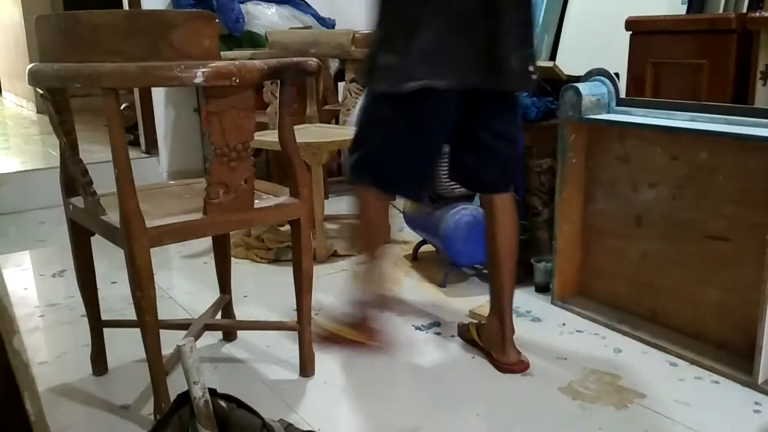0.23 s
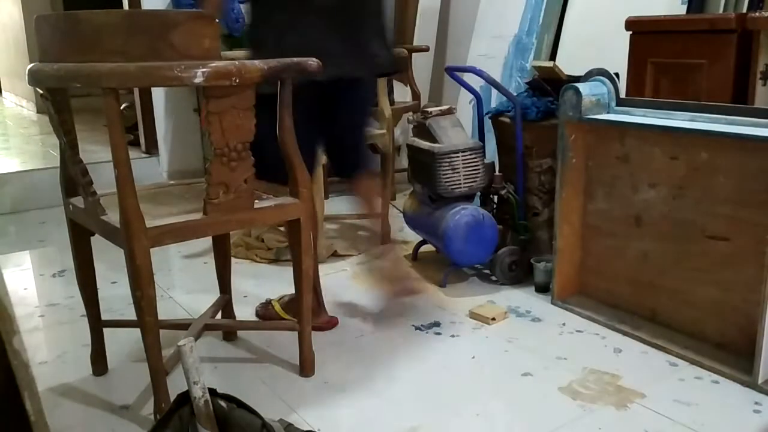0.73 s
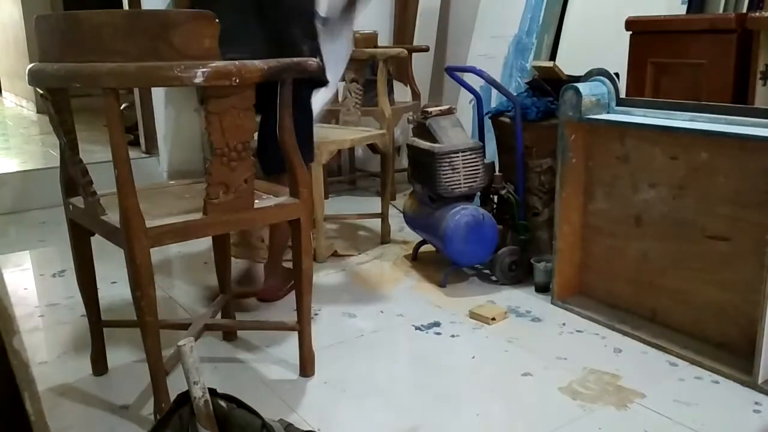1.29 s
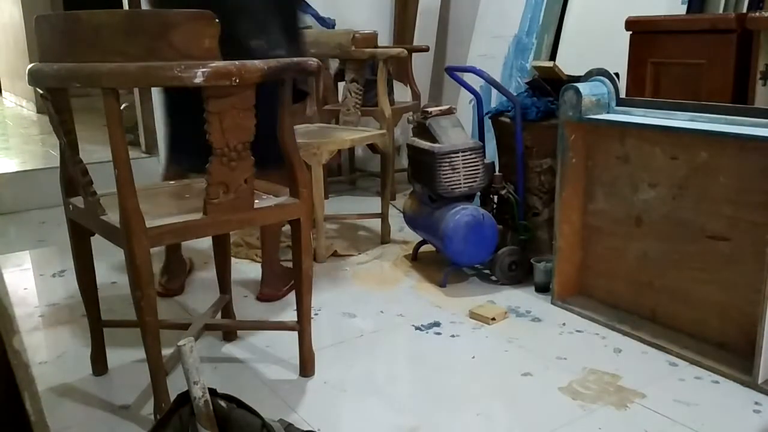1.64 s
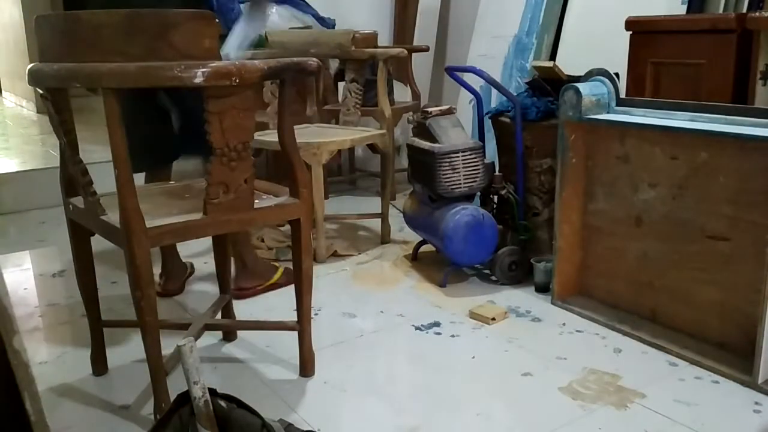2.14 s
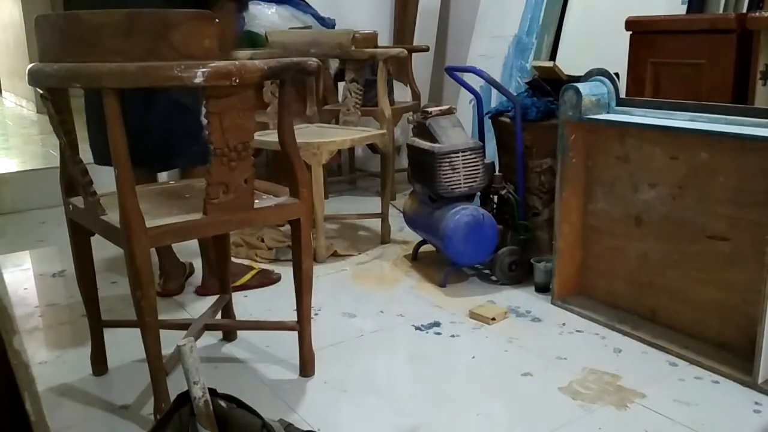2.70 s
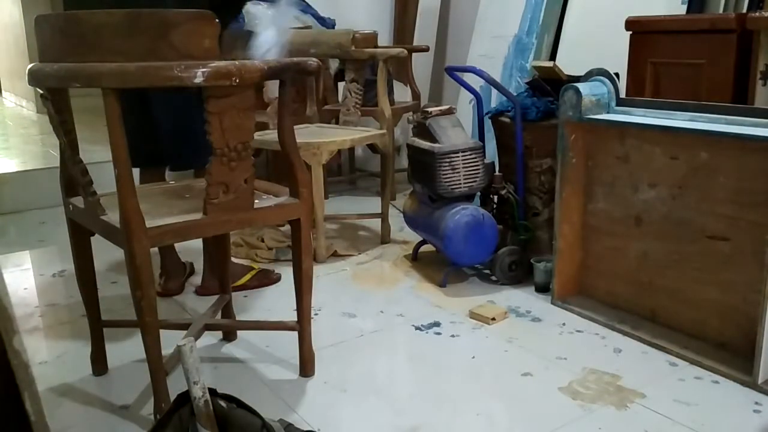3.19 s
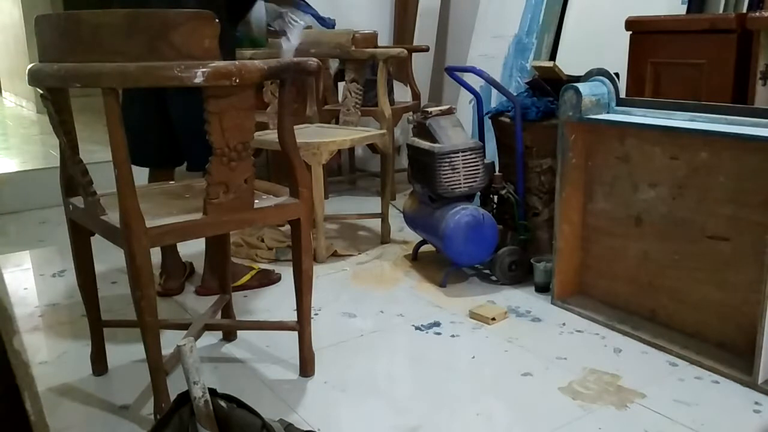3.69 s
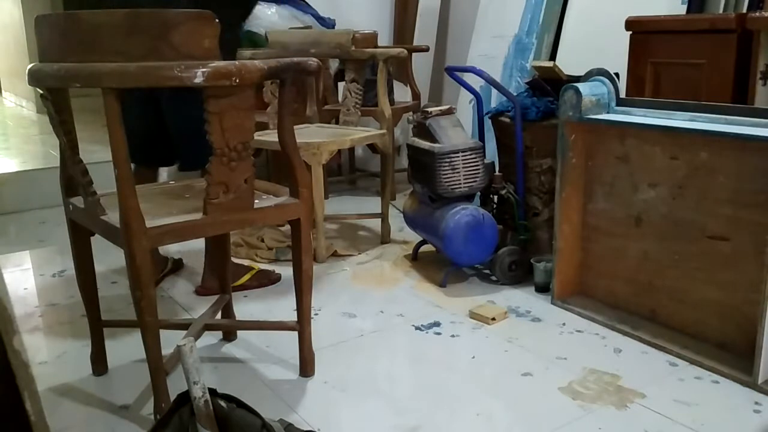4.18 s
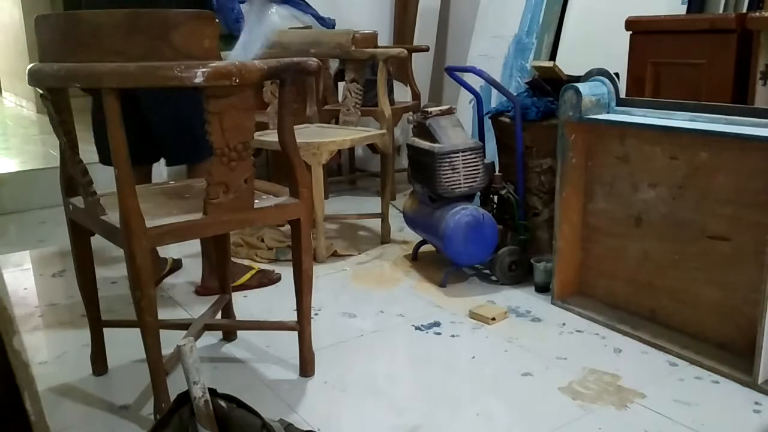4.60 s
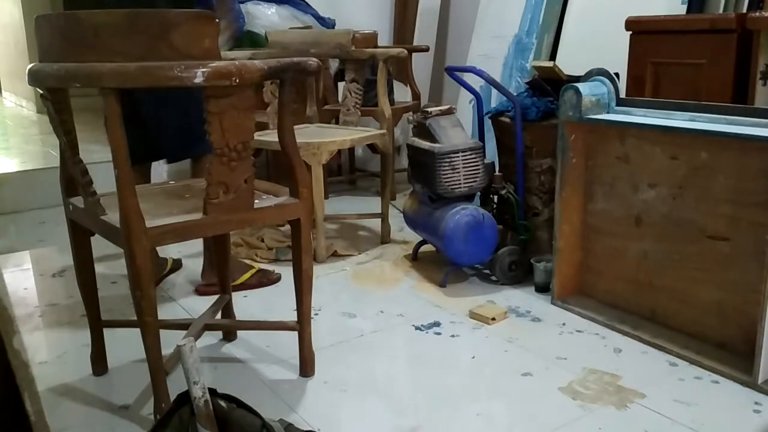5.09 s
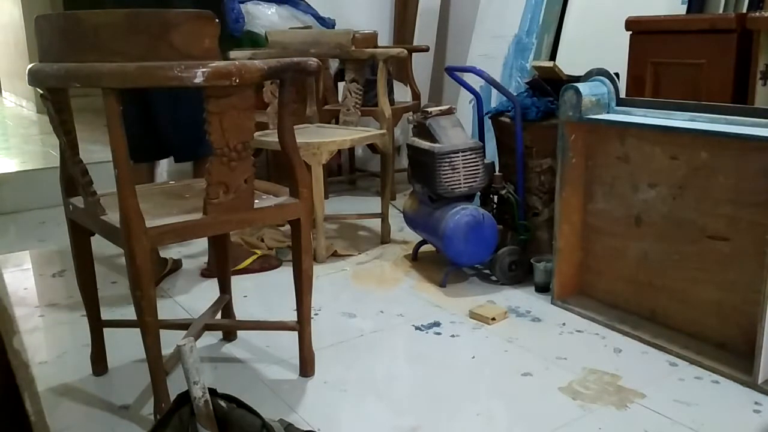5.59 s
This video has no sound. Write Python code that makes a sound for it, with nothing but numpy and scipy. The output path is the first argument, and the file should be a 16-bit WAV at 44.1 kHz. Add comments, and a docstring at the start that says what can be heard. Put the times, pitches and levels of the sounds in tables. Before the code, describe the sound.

Someone shuffles in rubber sandals, then beats dust off furniture with a cloth, each whoosh ending in a crackling smack that rings wood and room.

```python
"""A bare, tiled workshop: someone in flip-flops takes a few steps and beats dust off furniture with a cloth.
Soles tick and drag as fading or swelling grains of noise; waved cloth is a rush of air with a rubbing hiss.
Each stroke swishes in, lands in three crackling slaps, rings modes of wood and room, and sends a draught
to the microphone. Dense reflections answer the close sounds, but not the ring or the draught.
Far outside an engine enters partway, two wavering tones over a steady hush of filtered noise."""
import sys
import numpy as np
from scipy import signal
from scipy.fft import rfft, irfft, next_fast_len
from scipy.io import wavfile

SR = 44100
rng = np.random.default_rng(int(sys.argv[2]) if len(sys.argv) > 2 else 0)


def to_wav(s):
    """Save 16-bit WAV."""
    ch = np.atleast_2d(s).T  # columns
    pcm = np.round(np.clip(ch, -1, 1) * 32767)  # PCM
    wavfile.write(sys.argv[1], SR, pcm.astype(np.int16))


N = 257334
TIME = np.arange(N) / SR
AGE = TIME[:SR]  # one second in the life of an event

# Hush of the room, tone before its level is set: f/Hz, level/dB
HUSH_TONE = [(20, -8.5), (55, 3.5), (90, -3), (180, -2), (300, -10.5), (600, -14.5), (800, -23.5),
             (1200, -28), (2500, -36.5), (6000, -44.5), (11000, -31.5), (13000, -38.5), (15000, -61.5)]
# Far engine, before its gains: t/s, firing rate f/Hz, level/dB, third harmonic level/dB
ENGINE_COURSE = [(2.98, 125, -73, -89.5), (3.106, 138.6, -66, -94), (3.254, 172, -68, -80.5),
                 (3.496, 202.3, -67, -81), (3.664, 207, -74, -70), (3.77, 205, -69, -86.5),
                 (4.078, 222, -74, -93.5), (4.21, 201.4, -58, -61.5), (4.66, 188.4, -64.5, -85),
                 (4.752, 190.6, -61.5, -78), (4.8, 196, -67, -76), (5.27, 190.1, -67.5, -91),
                 (5.348, 182.4, -55, -80), (5.5, 188.5, -68, -92.5)]
# Reverberation, before the last of the tail is faded: f/Hz, t60/s
ROOM_DECAY = [(60, 0.5), (250, 0.58), (600, 0.64), (1500, 0.68), (3000, 0.71), (6000, 0.54), (11000, .57),
              (16000, 0.43)]
# The walker crosses from right to centre: t/s, delay at the left port/ms
WALKER_BEARING = [(0, 0.43), (1, 0.25), (2.6, .12), (4.3, .04), (5.8, 0.034)]
# Tone difference of the ports: f/Hz, right minus left level/dB
PORT_DIFFERENCE = [(70, 1.7), (180, -2.1), (500, 0.5), (1500, 0.5), (3000, -3), (6000, 2), (9500, 4),
                   (14000, 2.5)]
# Fine rubbing and ticking, relative tone: f/Hz, level/dB
RUB_TONE = [(30, -41), (1500, -15.5), (4500, -16.5), (8000, -7), (11000, 1), (13500, -1.5), (16000, -8.5)]
# Rush of air, relative tone: multiple of the centre frequency, level/dB
AIR_TONE = [(.04, -18), (.4, -12.5), (.7, -5), (1, -4), (1.4, -7.5), (2.8, -15.5), (5, -25.5), (20, -44.5)]
# Narrow resonances nearby that sing with every rush of air: f/Hz, width/Hz, added level/dB
RESONANCES = [(770, 45, 0.5), (1028, 15, 6), (1560, 90, -1.5), (2200, 270, -2)]
# Flip-flop ticks, before room and port gains: t/s, level/dB, fade time/ms, tilt/(dB per octave)
SOLE_TICKS = [(0.2485, -52.5, 5, 7), (0.3418, -61, 1.1, -2), (0.353, -57, 1, 2), (0.5422, -64, 2.5, 9)]
# Soles drag over the tiles, before room and port gains:
# t/s of the peak, fall/s, air level/dB, air centre f/Hz, hiss level/dB
SOLE_SCUFFS = [(0.01, 0.045, -68.5, 1890, -72), (0.205, 0.022, -64.5, 495, -60.5),
               (0.249, 0.13, -99, 900, -44.5), (0.358, 0.078, -58.5, 1320, -47),
               (0.458, 0.065, -61, 1120, -61.5)]
# Cloth lifted or shaken out between strokes, before room and port gains:
# t/s of the peak, rise/s, air level/dB, hiss level/dB
CLOTH_WAVES = [(0.716, 0.12, -69, -98), (0.91, 0.036, -52, -44.5), (1.24, 0.091, -44.5, -52.5),
               (1.358, 0.058, -54.5, -50), (1.607, 0.069, -60.5, -77.5), (1.705, 0.041, -45, -48.5),
               (2.068, 0.089, -45, -53.5), (2.15, 0.023, -56, -58), (2.457, 0.049, -54.5, -48.5),
               (3.144, 0.099, -61, -80.5), (3.458, 0.099, -61.5, -86), (5.329, 0.1, -68.5, -92),
               (5.467, 0.029, -74.5, -60)]
# Cloth smacking on wood, relative tone: f/Hz, level/dB
SMACK_TONE = [(30, -29.5), (150, -7), (260, 2.5), (450, -3), (680, -2.5), (850, -8), (1200, -8),
              (1600, -13), (2100, -14), (3000, -26.5), (5000, -34.5), (16000, -59)]
# Snapping fibres, relative tone: f/Hz, level/dB
CRACKLE_TONE = [(30, -49.5), (1000, -15), (3500, -4.5), (5500, -9), (8000, -5.5), (10500, 2), (12500, 1.5),
                (15500, -9.5), (20000, -17)]
# Modes of the furniture, relative: f/Hz, t60/s, first spot level/dB, second spot level/dB
WOOD_MODES = [(178.4, 0.79, -22.5, -47), (216.7, 0.3, -5.5, -22), (220.7, 0.51, -4, -7),
              (242.5, 0.39, -27, 2.5), (291.3, 0.6, -32.5, -12), (352.4, 0.13, -6, -29.5),
              (478, 0.44, -26.5, -6), (535, 0.46, -17, -26), (672, 0.45, -14.5, -15),
              (1003, 0.33, -15.5, -36), (1145, .4, -21.5, -34.5), (1497, 0.65, -28, -34),
              (2070, 0.56, -35.5, -43)]
# Standing waves of the room, relative: f/Hz, t60/s, level/dB
ROOM_MODES = [(56.6, 0.75, 2.5), (60.6, 0.46, -12.5), (105.4, 1, -15), (122, 0.53, -9.5)]
# Rumble of moving air, relative tone: f/Hz, level/dB
DRAUGHT_TONE = [(15, -7.5), (35, 6.5), (65, -3), (110, -12), (250, -21.5), (1000, -103.5)]
# Tip, body and trailing folds: thump half-width/ms, multiple of the stroke's fade time,
# crackle level/dB against the stroke's
SLAP_CONTACTS = [(3.3, 1.2, -1), (1.3, 1, -0.5), (1.8, 3, 0.5)]
# Strokes, levels before the gains of each layer: t/s, lead of the tip/ms,
# tip and trailing folds level/dB against the main slap, fade time of the main contact/ms,
# smack level/dB, smack tilt/(dB per octave), crackle level/dB, air thump level/dB, swing level/dB,
# wood level/dB, place (0 first spot, 1 second spot), room boom level/dB,
# draught level/dB, travel time of the draught/s, fade time of its eddies/s
CLOTH_STROKES = [(0.938, 9.2, -7, -1.5, 1.72, -26, 0.64, -32.5, -31, -41, -9.5, 0.065, -25.5, -43, 0.23, .12),
                 (1.767, 10, -5, -7.5, 2.9, -31.5, -0.1, -41, -29, -37, -26, 0.02, -33, -33.5, .15, .06),
                 (2.584, 6, 2, -1, 3.1, -34.5, 1, -38, -33, -56, -15, 0.8, -38.5, -52.5, 0.11, 0.09),
                 (4.2947, 8, -23.5, 0, 3.87, -35.5, 1, -40.5, -34.5, -55, -27.5, 0.26, -28.5, -40, 0.18, 0.19),
                 (4.9089, 22, -11.5, -4, 1.92, -32, 0.5, -43.5, -31, -61, -24.5, 0.74, -33.5, -42.5, 0.12, 0.58),
                 (5.6047, 10.5, -17.5, -2.5, 0.68, -28.5, -1.87, -41, -28, -59, -34, 1, -26.5, -55, 0.084, 0.11)]

HUSH_DB = -67
ENGINE_FADE_S = 0.051  # it comes in just before its first point
ENGINE_DB, THIRD_DB = 2.5, 2.5  # gain of the firing tone and of its third harmonic
ENGINE_WOBBLE, THIRD_WOBBLE = 0.0291, 0.0057  # pitch wobble as a share of the frequency
# A far wall sends back a second bunch of reflections
WALL_ECHO_S, WALL_ECHO_SPREAD_S, WALL_ECHO_DB = 0.092, 0.0098, -12.5
PORT_GAP_M, TOP_HZ = 0.17, 16200
SCUFF_RISE = 0.18  # rise time as a share of the fall
WAVE_HZ, WAVE_FALL = 870, 0.8  # centre of the rush of air; fall time as a share of the rise
# The swing peaks just ahead of the slap; its hiss is set against its air
SWING_LEAD_S, SWING_RISE_S, SWING_FALL_S, SWING_HZ, SWING_HISS_DB = 0.019, 0.035, 0.0058, 400, -21
THUMP_LEAD_S = 0.01  # room for the push before the thump's centre
TRAIL_S, RING_LAG_S = 0.014, 0.004  # after the main slap: folds land, wood starts to ring
PUSH_LEAD_S, PUSH_S, PUSH_DB = 0.038, 0.022, -13  # air ahead of the cloth; dB against the thump
DRAUGHT_S, EDDY_DB = 0.046, -7  # dB against the draught


def undb(db):
    """Decibels to gain."""
    return 10 ** (np.asarray(db) / 20)


def at_pitch(hz, points):
    """Read (Hz, value) points on a log-frequency axis."""
    f, value = np.transpose(points)
    return np.interp(np.log(np.maximum(hz, 1)), np.log(f), value)


def colour(x, points):
    """Minimum-phase filter with the given (Hz, dB) response, made by folding its cepstrum."""
    size = next_fast_len(len(x) + SR // 10) * 2
    gain = undb(at_pitch(np.fft.rfftfreq(size, 1 / SR), points))
    cepstrum = irfft(np.log(gain))
    cepstrum[1:size // 2] *= 2
    cepstrum[size // 2 + 1:] = 0
    response = np.exp(rfft(cepstrum))
    return irfft(rfft(x, size) * response)[:len(x)]


def tilted(points, db_per_octave):
    """Tilt a tone towards the treble or the bass."""
    return [(hz, db + db_per_octave * np.log2(hz)) for hz, db in points]


def level(x, db):
    """Set the rms level."""
    return x * undb(db) / np.sqrt(np.mean(x ** 2))


def burst(x, db):
    """Give a short sound the energy of db held for a tenth of a second."""
    return x * undb(db) * np.sqrt(SR / 10 / np.sum(x ** 2))


def left_delay_ms(s):
    """Sound from the right reaches the left port later."""
    return np.interp(s, *np.transpose(WALKER_BEARING))


def add(out, s, x):
    """Mix x in at time s, a little later at the left port."""
    arrivals = (s + left_delay_ms(s) / 1000, s)
    for port, sound, when in zip(out, np.broadcast_to(x, (2, SR)), arrivals):
        start = int(round(when * SR))
        lo, hi = max(start, 0), min(start + SR, N)
        port[lo:hi] += sound[lo - start:hi - start]


def walk(rate):
    """Slow random curve through rate knots a second, centred on zero."""
    knots = rng.standard_normal(int(N / SR * rate) + 2)
    return np.interp(TIME * rate, np.arange(len(knots)), knots)


def grains(spread_db):
    """A second of dense clicks whose strength changes every 16 samples."""
    size, strength = rng.standard_normal((2, SR))
    return size * undb(spread_db * np.repeat(strength, 16)[:SR])


def fade(ms):
    """Exponential fade with the given time constant."""
    return np.exp(-AGE * 1000 / ms)


def decay(t60):
    """Exponential decay that loses 60 dB in t60 seconds."""
    return np.exp(-np.log(1000) * AGE / t60)


def diffuse(size):
    """Noise from all sides at two spaced ports: alike in the bass, unrelated in the treble."""
    likeness = np.sinc(2 * np.fft.rfftfreq(size, 1 / SR) * PORT_GAP_M / 343)  # speed of sound in m/s
    mid, side = rfft(rng.standard_normal((2, size))) * np.sqrt([1 + likeness, 1 - likeness])
    return irfft([mid + side, mid - side], size)


def room(x, direct_db, build_s=0.0033, early_db=1.0, early_s=0.011, end_s=0.38):
    """The direct sound, then reflections that thicken quickly and die away band by band."""
    field, tail = rfft(diffuse(SR)), 0
    octave = np.log2(np.clip(np.arange(field.shape[1]), 64, 16384))
    for k in range(6, 15, 2):  # overlapping bands centred on 2 ** k Hz
        band = irfft(field * np.maximum(1 - abs(octave - k) / 2, 0), SR)
        tail = tail + band * decay(at_pitch(2 ** k, ROOM_DECAY))
    # floor and nearby furniture crowd the first reflections
    tail = tail * (1 - np.exp(-AGE / build_s)) * (1 + undb(early_db) * np.exp(-AGE / early_s))
    tail *= 1 + undb(WALL_ECHO_DB) * np.exp(-((AGE - WALL_ECHO_S) / WALL_ECHO_SPREAD_S) ** 2)
    # the last of the tail fades faster
    tail *= np.exp(-(AGE / end_s) ** 4)
    tail /= np.sqrt(np.sum(tail ** 2) / 2)
    tail[:, 0] += undb(direct_db)
    return signal.fftconvolve(tail, x[None], axes=1)[:, :SR]


def clutter(x, echo_db=-11.0, corner_hz=2500.0, count=8):
    """Chair legs and rails close by throw back the treble within a few milliseconds, which combs it."""
    hz = np.fft.rfftfreq(SR, 1 / SR)
    echoes = np.zeros(SR)
    delays = rng.integers(SR // 2000, SR // 130, count)
    echoes[delays] = undb(echo_db) * rng.choice([-1, 1], count)
    share = hz / (hz + corner_hz)
    comb = (1 + share * rfft(echoes)) / np.sqrt(1 + share ** 2 * np.sum(echoes ** 2))
    return irfft(rfft(x) * comb, SR)


def hush():
    """Diffuse coloured noise, alike at both ports only in the bass, with a slight waver in level."""
    noise = np.array([colour(port, HUSH_TONE) for port in diffuse(N)])
    return level(noise, HUSH_DB) * undb(0.4 * walk(6))


def far_tone(hz, db, wobble):
    """A tone that arrives by many paths, so that it wavers and flutters."""
    phase = 2 * np.pi * np.cumsum(hz * (1 + wobble * walk(30))) / SR
    paths = 1 + 0.5 * (walk(25) + 1j * walk(24))
    return np.imag(paths * np.exp(1j * phase)) * undb(db + 1.5 * walk(14))


def far_engine():
    """The firing tone and its third harmonic climb in pitch, then ease back and hover."""
    s, *columns = np.transpose(ENGINE_COURSE)
    hz, db, third_db = (np.interp(TIME, s, column) for column in columns)
    firing = far_tone(hz, db + ENGINE_DB, ENGINE_WOBBLE)
    third = far_tone(3 * hz, third_db + THIRD_DB, THIRD_WOBBLE)
    comes_in = np.clip(1 + (TIME - s[0]) / ENGINE_FADE_S, 0, 1)
    return (firing + third) * comes_in


def flip_flops():
    """Rubber soles tick on gritty tiles close by: fading grains with a rubbing tone."""
    out = np.zeros((2, N))
    for s, db, fade_ms, tilt_db in SOLE_TICKS:
        tick = colour(grains(2.0) * fade(fade_ms), tilted(RUB_TONE, tilt_db))
        ports = undb([[-9.0], [-5.0]])  # left, right
        add(out, s, room(burst(tick, db), direct_db=9.5) * ports)
    return out


def sing(x):
    """Add the narrow resonances that a rustle excites."""
    out = x
    for hz, width, db in RESONANCES:
        out = out + undb(db) * signal.lfilter(*signal.iirpeak(hz, hz / width, fs=SR), x)
    return out


def swish(s, rise, fall, air_db, air_hz, hiss_db):
    """Moving cloth or a dragging sole: a rush of air with the hiss of rubbing on top."""
    out = np.zeros((2, N))
    lead = 0.25  # s of run-up before the peak
    speed = np.exp(-((AGE - lead) / np.where(AGE < lead, rise, fall)) ** 2)
    air_tone = [(k * air_hz, db) for k, db in AIR_TONE]
    air = burst(sing(colour(grains(3.5) * speed, air_tone)), air_db)
    hiss = burst(colour(grains(4.3) * speed, RUB_TONE), hiss_db)
    shade_db = 3.6 * left_delay_ms(s)  # the phone shades its far port
    ports = undb(np.array([[-shade_db], [shade_db]]) - 7.5)
    add(out, s - lead, room(clutter(air + hiss), direct_db=-2.5) * ports)
    return out


def scuffs():
    """A sole catches the floor quickly and slides to rest."""
    return sum(swish(s, SCUFF_RISE * fall, fall, air_db, air_hz, hiss_db)
               for s, fall, air_db, air_hz, hiss_db in SOLE_SCUFFS)


def waving():
    """The cloth stirs a rush of air as it is waved about between strokes."""
    return sum(swish(s, rise, WAVE_FALL * rise, air_db, WAVE_HZ, hiss_db)
               for s, rise, air_db, hiss_db in CLOTH_WAVES)


def gust(s, push_db, draught_db, travel_s, eddy_s):
    """A stroke pushes air ahead and sends a draught after it, whose eddies rumble on the microphone."""
    push = np.exp(-((TIME - s + PUSH_LEAD_S) / PUSH_S) ** 2)
    since = TIME - s - travel_s
    draught = np.exp(-(since / DRAUGHT_S) ** 2)
    eddies = (since > 0) * undb(EDDY_DB) * np.exp(-abs(since) / eddy_s)
    strength = undb(push_db) * push + undb(draught_db) * np.maximum(draught, eddies)
    return strength * level(colour(rng.standard_normal(N), DRAUGHT_TONE), 0)


def ring(hz, t60, rise_s, turn):
    """One mode that swells and fades, with its own phase for each value of turn."""
    swell = 1 - np.exp(-(AGE / rise_s) ** 2)
    return np.sin(2 * np.pi * hz * (AGE + turn)) * swell * decay(t60)


def furniture(s, wood_db, place, boom_db):
    """The place of a blow decides which modes of the wood speak; the room booms along."""
    out = np.zeros((2, N))
    turn = rng.random() / 50  # s
    wood = sum(undb(np.interp(place, [0, 1], spots_db)) * ring(hz, t60, 0.012, turn)
               for hz, t60, *spots_db in WOOD_MODES)
    boom = sum(undb(db) * ring(hz, t60, 0.005, turn) for hz, t60, db in ROOM_MODES)
    add(out, s, undb(wood_db) * wood + undb(boom_db) * boom)
    return out


def folds(fade_ms):
    """Many folds land within milliseconds: a scatter of clicks evened out to equal strength at every pitch."""
    clicks = rfft(grains(4.0) * fade(fade_ms))
    return irfft(clicks / abs(clicks), SR) * (AGE < 0.15)


def slap(thump_db, width_ms, smack_db, tilt_db, crackle_db, fade_ms):
    """Trapped air is pushed out and sucked back while folds smack and fibres crackle: (thump, room sound)."""
    u = (AGE - THUMP_LEAD_S) * 1000 / width_ms
    thump = burst(-u * np.exp(-u ** 2 / 2), thump_db - 6.0)
    smack_tone = tilted(SMACK_TONE, tilt_db)  # a slack cloth lands duller
    smack = burst(colour(folds(fade_ms), smack_tone), smack_db)
    crackle = burst(colour(grains(7.0) * fade(fade_ms), CRACKLE_TONE), crackle_db)
    return thump, room(clutter(smack + crackle) + undb(-1.0) * thump, direct_db=-12.5)


def slaps(s, lead_ms, tip_db, trail_db, fade_ms, smack_db, tilt_db, crackle_db, thump_db):
    """The tip of the cloth lands first, then its body, then the trailing folds."""
    out = np.zeros((2, N))
    landings = [(s - lead_ms / 1000, tip_db), (s, 0), (s + TRAIL_S, trail_db)]
    for (when, db), (width_ms, longer, fibre_db) in zip(landings, SLAP_CONTACTS):
        thump, sound = slap(thump_db + db, width_ms, smack_db + db, tilt_db,
                            crackle_db + fibre_db + db, longer * fade_ms)
        add(out, when - THUMP_LEAD_S, thump)
        add(out, when, sound)
    return out


def stroke(s, lead_ms, tip_db, trail_db, fade_ms, smack_db, tilt_db, crackle_db, thump_db,
           swing_db, wood_db, place, boom_db, draught_db, travel_s, eddy_s):
    """One stroke of the cloth: it swings in, slaps, rings the wood and stirs the air."""
    swing = swish(s - SWING_LEAD_S, SWING_RISE_S, SWING_FALL_S,
                  swing_db, SWING_HZ, swing_db + SWING_HISS_DB)
    landing = slaps(s, lead_ms, tip_db, trail_db, fade_ms, smack_db, tilt_db, crackle_db, thump_db)
    ringing = furniture(s + RING_LAG_S, wood_db, place, boom_db)
    wind = gust(s, thump_db + PUSH_DB, draught_db, travel_s, eddy_s)
    return swing + landing + ringing + wind


def scene():
    """Everything at the two microphone ports, from the background to the beating."""
    background = hush() + far_engine()
    steps = flip_flops() + scuffs()
    beating = waving() + sum(stroke(*row) for row in CLOTH_STROKES)
    return background + steps + beating


def record(dry):
    """The two ports colour the sound differently, and the phone cuts the deepest bass and the top."""
    ports = [colour(x, [(hz, side * db / 2) for hz, db in PORT_DIFFERENCE])
             for x, side in zip(dry, (-1, 1))]
    bass_cut = signal.butter(1, 28.0, "high", fs=SR, output="sos")
    top_cut = signal.ellip(10, 0.2, 80, TOP_HZ, fs=SR, output="sos")
    return signal.sosfilt(top_cut, signal.sosfilt(bass_cut, np.array(ports)))


dry = scene()
out = record(dry)
to_wav(out)
```